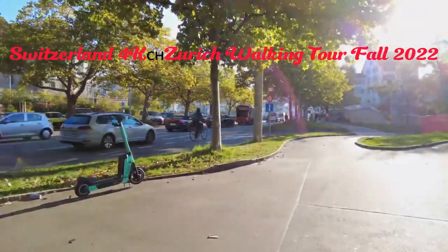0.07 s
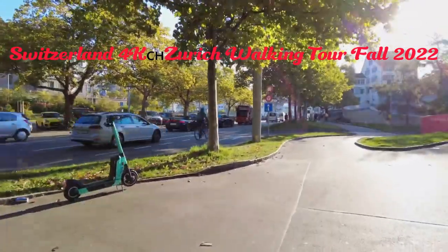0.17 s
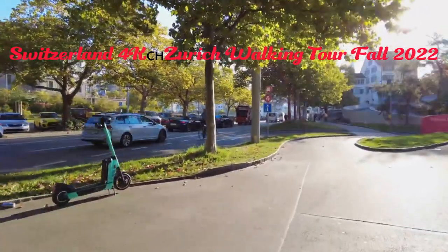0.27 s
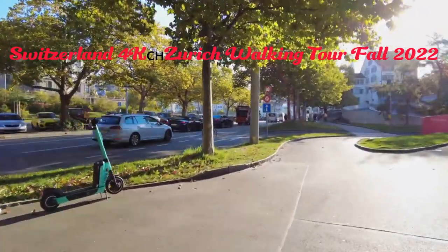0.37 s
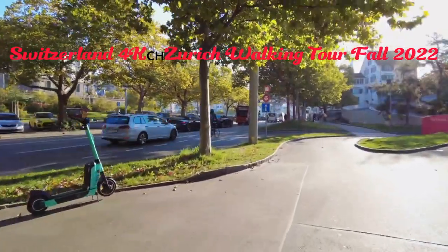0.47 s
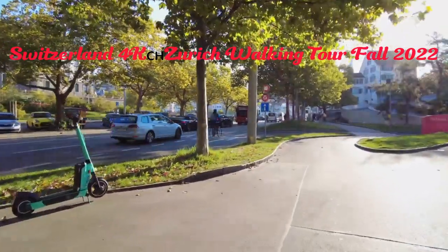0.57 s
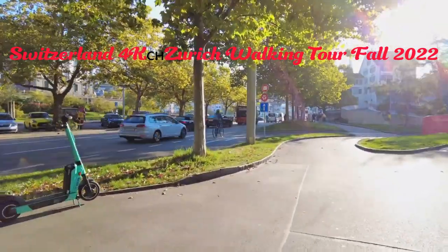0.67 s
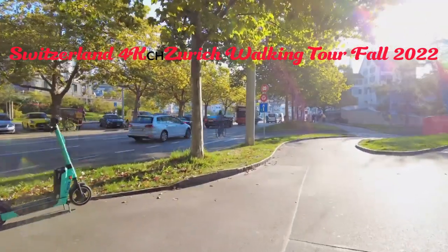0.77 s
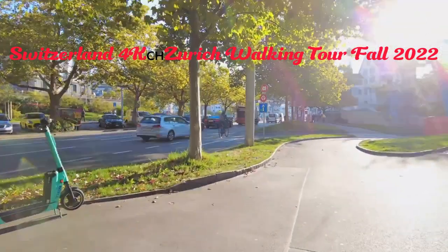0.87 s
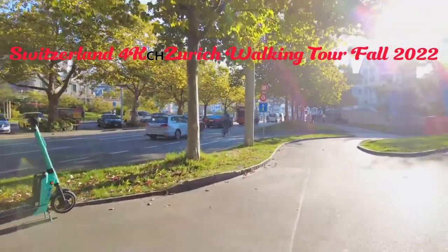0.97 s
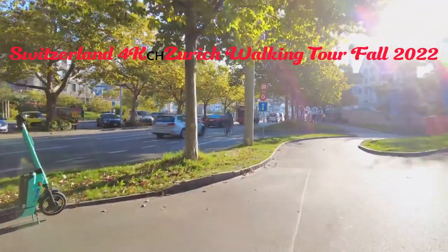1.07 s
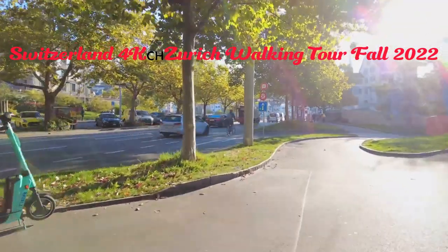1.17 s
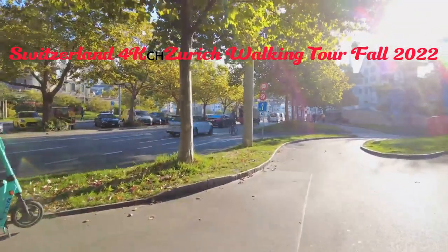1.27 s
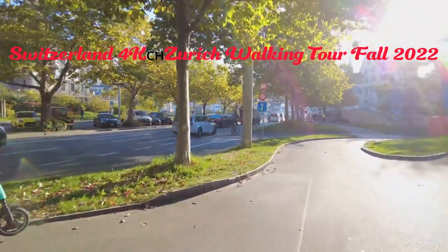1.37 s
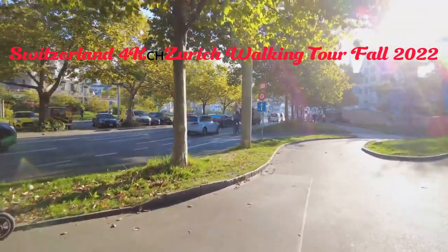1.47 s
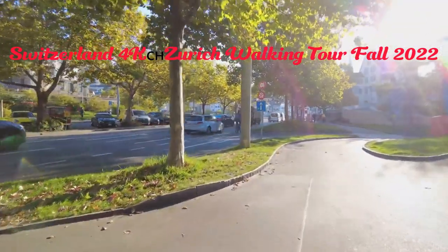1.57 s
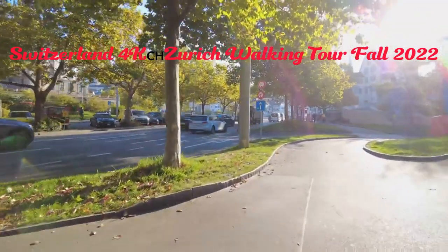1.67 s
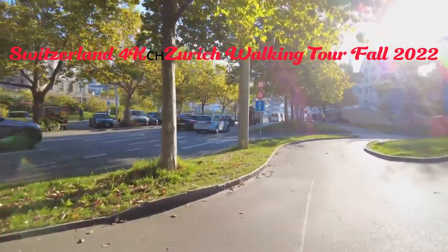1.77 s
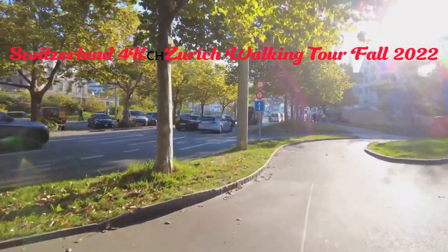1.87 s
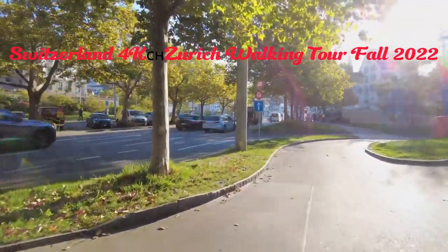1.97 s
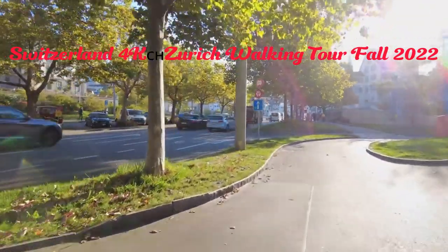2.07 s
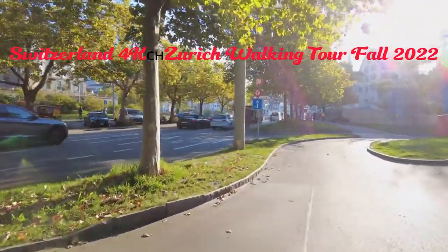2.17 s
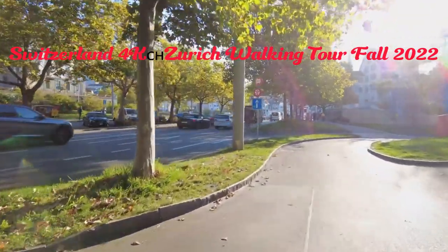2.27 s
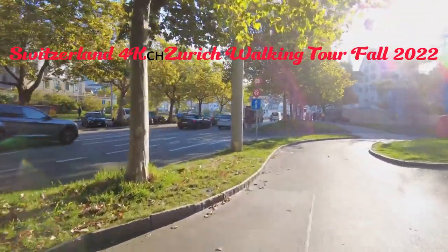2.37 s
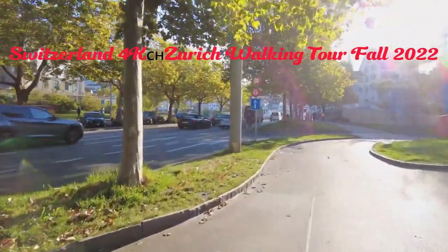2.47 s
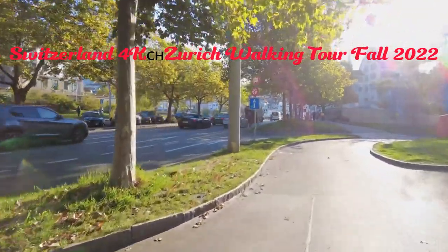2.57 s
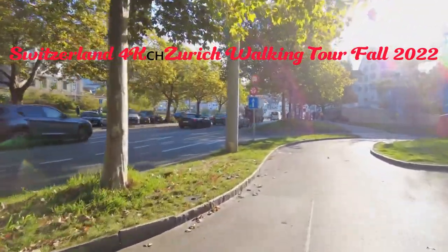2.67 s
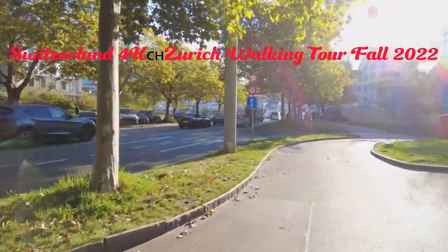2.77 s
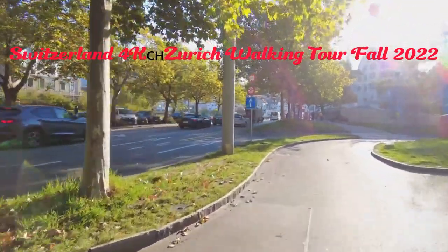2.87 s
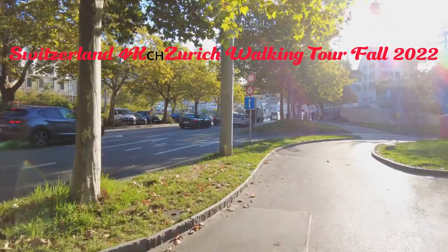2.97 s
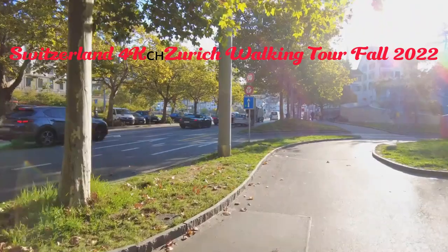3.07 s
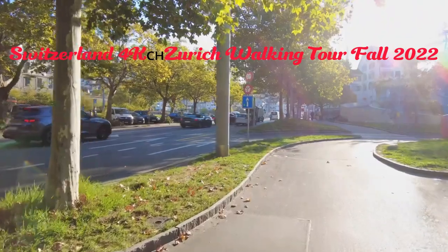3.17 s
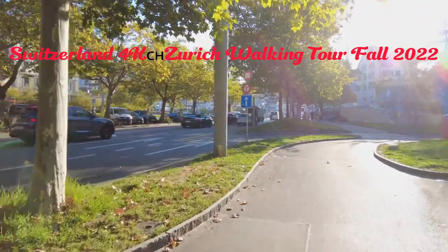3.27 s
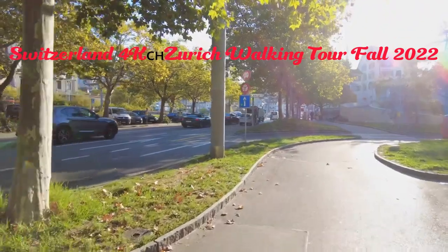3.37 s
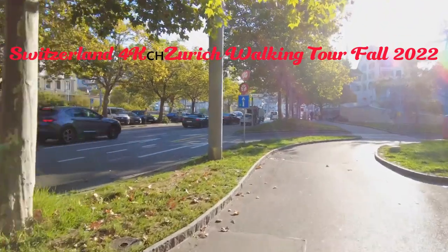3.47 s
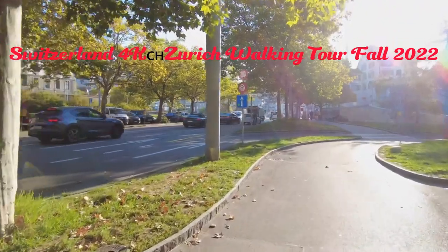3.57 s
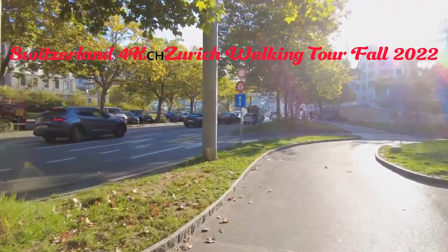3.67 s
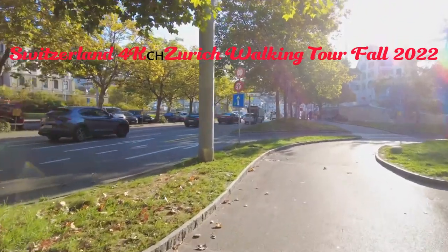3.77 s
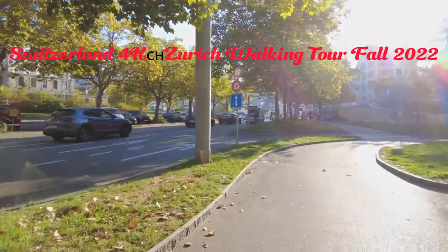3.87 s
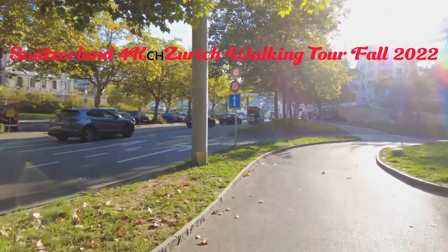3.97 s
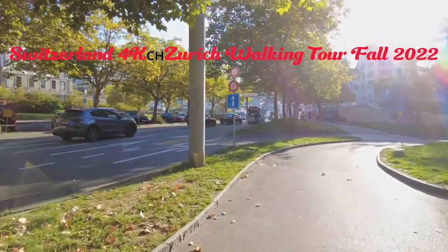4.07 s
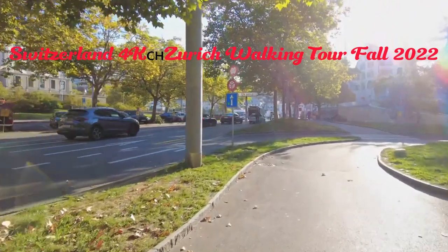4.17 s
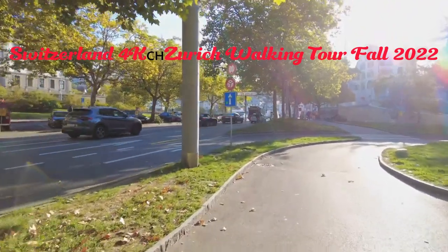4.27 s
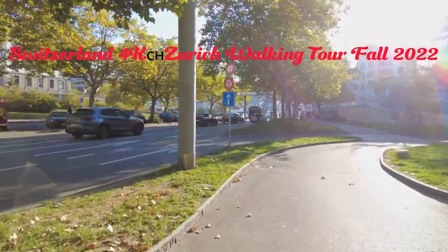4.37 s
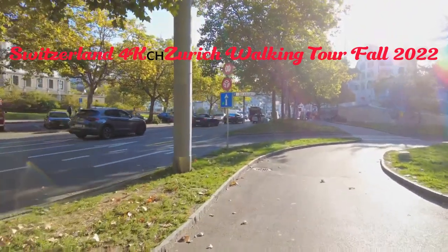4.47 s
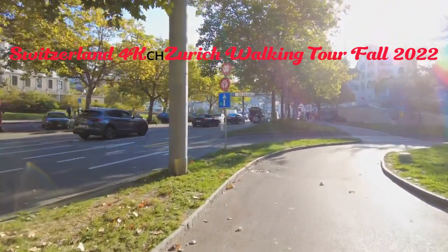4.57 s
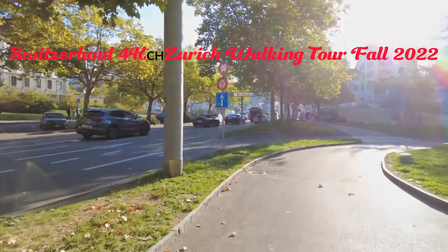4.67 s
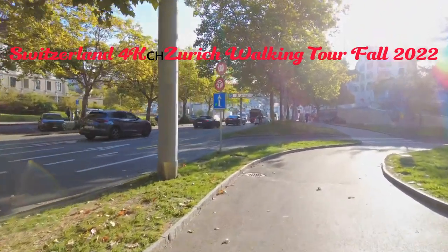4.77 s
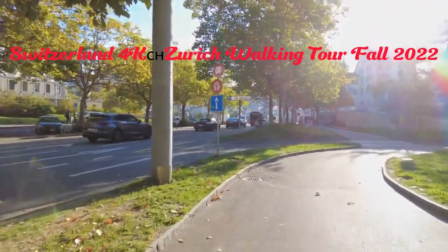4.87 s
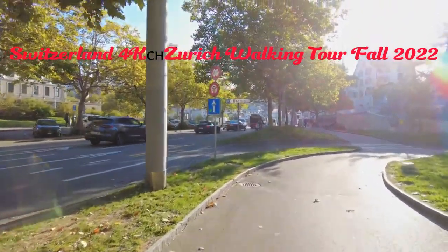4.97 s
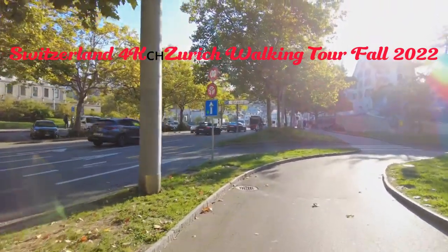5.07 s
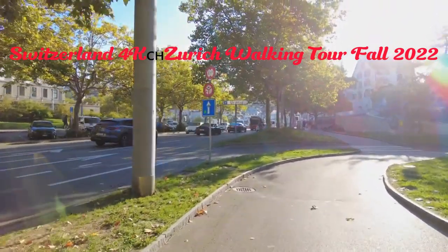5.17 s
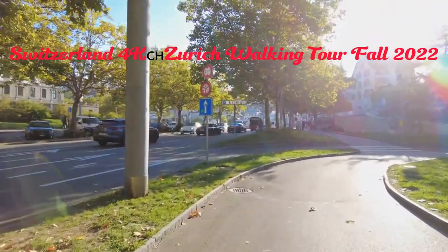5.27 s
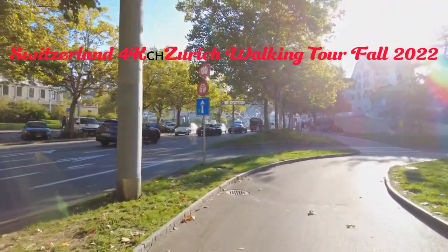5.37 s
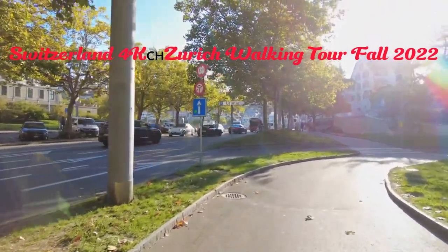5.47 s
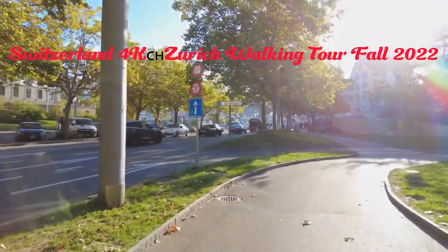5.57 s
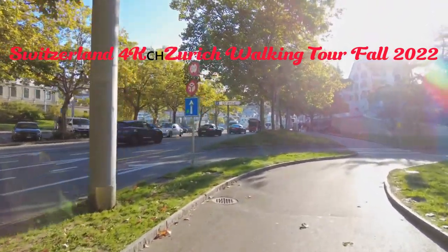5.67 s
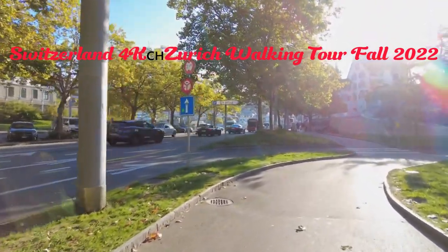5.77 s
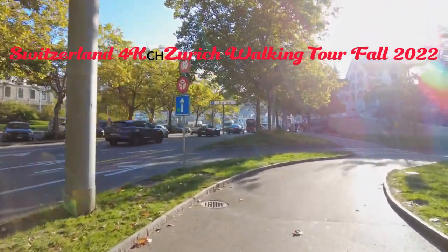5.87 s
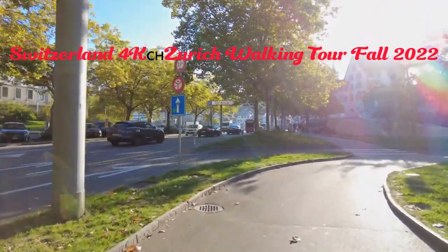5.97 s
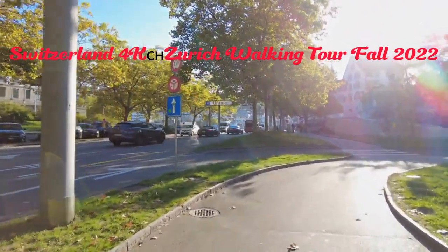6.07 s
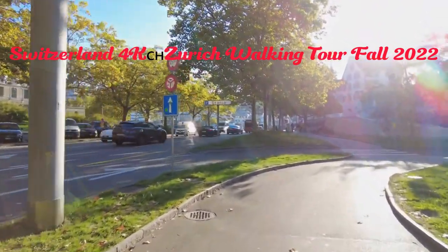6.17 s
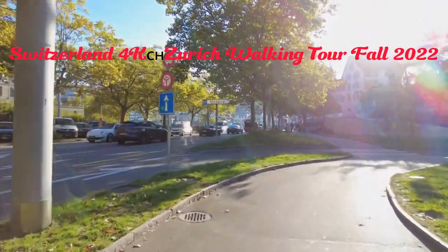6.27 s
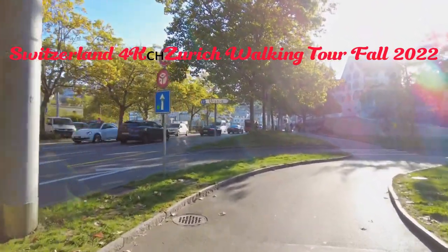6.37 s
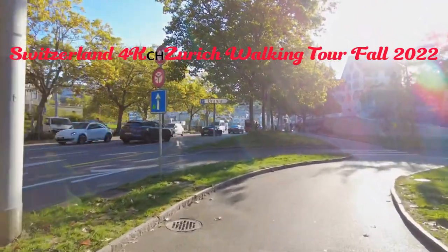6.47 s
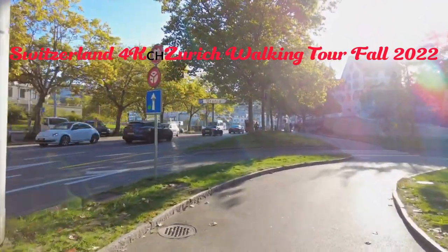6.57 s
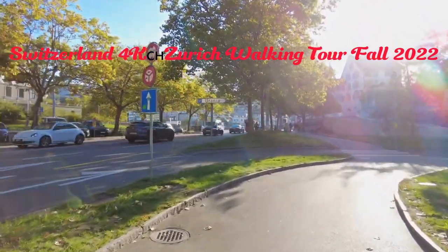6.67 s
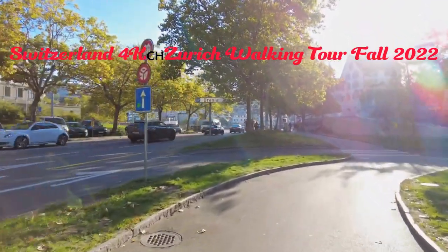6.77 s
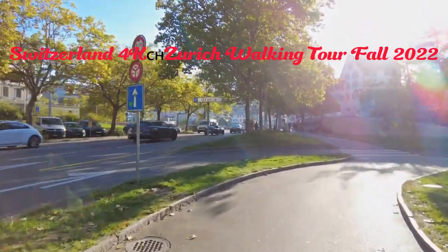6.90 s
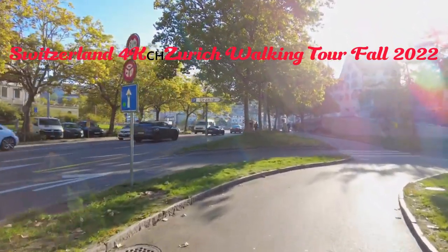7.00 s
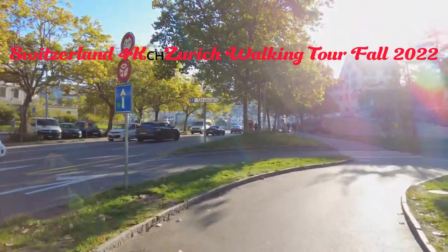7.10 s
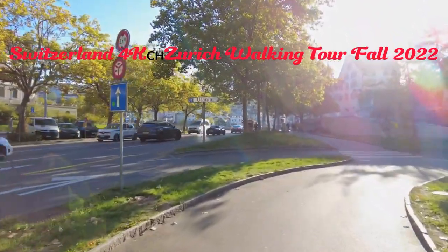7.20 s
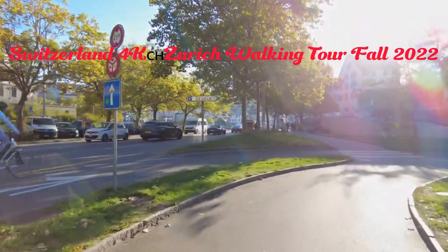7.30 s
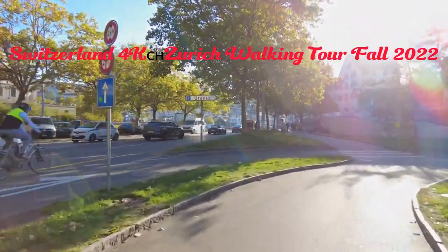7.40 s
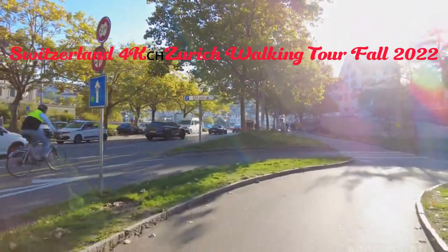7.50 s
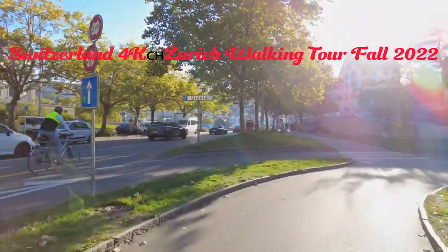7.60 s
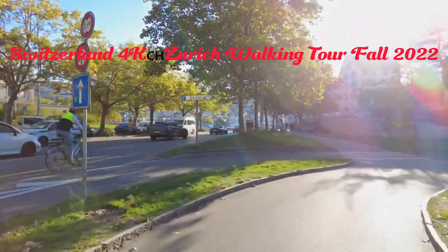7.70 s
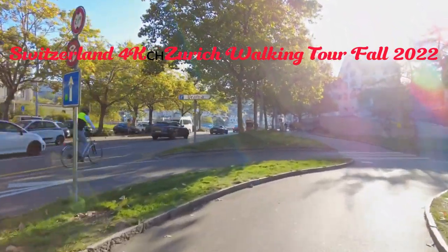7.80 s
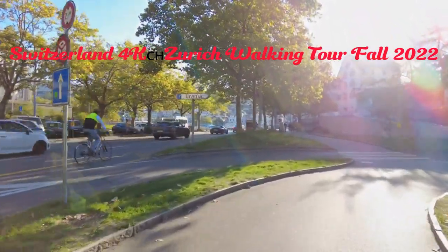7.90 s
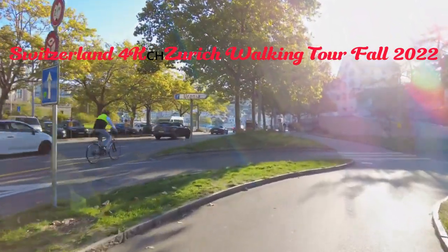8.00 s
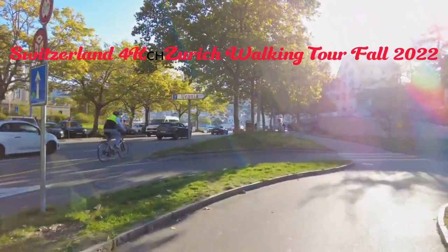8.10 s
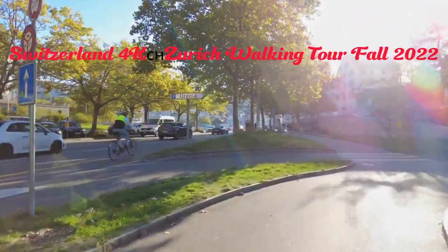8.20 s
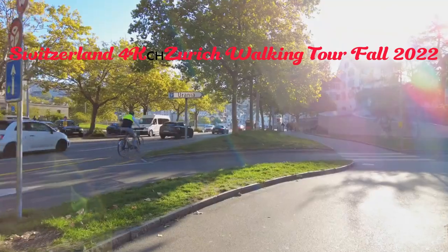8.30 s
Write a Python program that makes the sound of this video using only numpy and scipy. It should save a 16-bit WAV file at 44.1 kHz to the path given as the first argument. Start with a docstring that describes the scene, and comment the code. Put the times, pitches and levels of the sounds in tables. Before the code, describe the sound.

Slow city traffic rumbles and drones beside a walker whose shoes scuff softly on gritty asphalt, with low engine notes swelling and sinking.

```python
"""City street on foot, slow traffic

A walker passes along a street, picked up in two channels with the cars and the shoes.
Engines drone as sines on their firing rates among single gliding tones; low thuds are decaying modes.
Exhaust boom and rumble, roar, tyres and hiss are shaped noise that drifts in level and bearing.
Shoes scuff in clumps of tiny clicks on gritty asphalt, and single grains snap with a short ping.
"""
import sys
import numpy as np
from scipy import signal
from scipy.fft import rfft, irfft
from scipy.io import wavfile
from scipy.ndimage import uniform_filter1d

SR = 44100
rng = np.random.default_rng(int(sys.argv[2]) if len(sys.argv) > 2 else 0)


def transcribe(u):
    """Save the signal u as a 16-bit wav file named by the first command-line argument.

    u: samples, shape (n,) or (channels, n), limited to [-1, 1]; the rate is SR.
    q: integer samples, one column per channel.
    """
    v = np.clip(np.atleast_2d(u).T, -1, 1)
    q = np.round(v * 32767).astype(np.int16)
    wavfile.write(sys.argv[1], SR, q)


N = 367794

# likeness, lead and level difference of the two channels by frequency, before the road noise wanders:
# (frequency [Hz], likeness [0-1], lead of the left channel [rad], left minus right [dB])
CHANNEL_PAIR = [(60, .99, .16, -1.8), (200, .95, .5, .2), (350, .9, .93, .2), (480, .85, 1.3, 1),
                (600, .68, 1.72, 1.4), (700, .7, 2.1, 1.7), (1000, .93, 3.1, 1.3), (1190, .93, 3.5, 2),
                (1205, .8, .47, 1.5), (1600, .78, .45, .7), (2300, .5, .6, .4), (3300, .14, 1.2, .8),
                (5000, .08, 2.9, 1.4), (7000, .12, 0, 1), (11000, .26, 0, .8), (15000, .28, 0, .7)]
# spectrum of crushed grit: (frequency [Hz], relative level [dB])
GRIT_SPECTRUM = [(2000, -30), (4000, 1), (6500, 0.5), (9000, -6.5), (12000, -10), (15500, -16)]


def gain_of(db):
    """Amplitude factor of a level in dB."""
    return 10 ** (np.asarray(db) / 20)


def evened(x):
    """Scales x to an rms of 1."""
    return x / np.sqrt(np.mean(x ** 2) + 1e-20)


def read(points, hz):
    """Reads the columns of a table at any frequency, along a log frequency axis."""
    f, *values = np.transpose(points)
    return np.squeeze([np.interp(np.log(hz + 1), np.log(f + 1), v) for v in values])


def add(mix, s, sound):
    """Lays a sound into the mix from s seconds on."""
    part = mix[..., round(s * SR):][..., :sound.shape[-1]]
    part += sound[..., :part.shape[-1]]


def colour(x, points):
    """Shapes x by a spectrum."""
    hz = np.fft.rfftfreq(x.shape[-1], 1 / SR)
    return irfft(rfft(x) * gain_of(read(points, hz)), x.shape[-1])


def drift(count, seconds):
    """Smooth random wander of rms 1."""
    size = int(seconds * SR) + 1
    once = uniform_filter1d(rng.standard_normal(count), size)
    return evened(uniform_filter1d(once, size))


def mottle(shape, bins, frames):
    """Random patches of rms 1, so many bins (10.8 Hz) wide and frames (23 ms) long."""
    wide = uniform_filter1d(rng.standard_normal(shape), size=bins, axis=0)
    return evened(uniform_filter1d(wide, size=frames, axis=1))


def road_power(hz, t):
    """Power of five noise layers, each a fixed spectrum under a moving level, two of them tilting."""
    # controls of the road noise; rumble, tyres and hiss take shares of the first two, the roar has its
    # own level: (time [s], nearness of the line of cars [dB], swell of rolling tyres [dB], roar level [dB])
    controls = [(0.0, 2, 1, -38.5), (.3, 3.5, 1.5, -42.5), (0.7, 3, 1, -44), (1.4, 2.5, 1, -41),
                (2.1, 1, -0.5, -44.5), (2.8, 0.5, -2, -45.5), (3.2, 0, -2, -46), (3.9, -1.5, -3.5, -51),
                (4.6, -2, -4, -53.5), (4.9, -1.5, -2.5, -51), (5.15, -2, -3.5, -48), (5.4, -2, -1.5, -50),
                (5.55, -2.5, 0.5, -47.5), (5.8, -3.5, 1, -47.5), (6.0, -2.5, -2, -47),
                (6.25, -2.5, -2.5, -49), (6.6, -0.5, 1, -47.5), (6.95, -2, -1.5, -50),
                (7.3, -1.5, 1.5, -51), (7.7, -0.5, 2, -44), (8.34, -1.5, 2.5, -46)]
    # level of the boom: (time [s], level [dB])
    boom_level = [(0.0, -33), (.5, -37), (1.4, -37), (2.8, -36.5), (3.7, -33.5), (4.5, -36.5), (4.9, -39),
                  (5.8, -36), (6.3, -38), (8.34, -39)]
    # rows rumble, tyres, hiss: (level [dB], share of nearness [ratio], share of tyre swell [ratio])
    layer_shares = [(-39.5, 0.66, -0.3), (-43.5, .05, 0.9), (-47.5, 0.93, 0.12)]
    # spectra of the layers, lowest first: (frequency [Hz], relative density [dB])
    boom_spectrum = [(15, -3), (30, 6.5), (45, 10.5), (60, 3.5), (100, -2.5), (150, -4.5), (200, -12),
                     (500, -60)]
    rumble_spectrum = [(60, -45), (150, -4.5), (200, -2), (250, -5.5), (300, -5.5), (380, -12.5),
                       (700, -22), (3000, -97)]
    roar_spectrum = [(100, -67), (250, 1.5), (400, 0), (520, -0.5), (548, 3), (580, -1), (700, -1),
                     (1000, -7), (2000, -37), (5000, -90)]
    tyre_spectrum = [(200, -66), (500, -25), (800, 0.5), (1000, -1), (1200, 0), (1380, 0.5), (1650, -1.5),
                     (1900, -8.5), (2300, -17), (4000, -60), (9000, -90)]
    hiss_spectrum = [(800, -65), (1700, 0), (2020, 0.5), (2300, -2), (2900, -0.5), (3600, -8.5), (4500, -9),
                     (6000, -13), (7000, -17), (8500, -21.5), (10000, -25.5), (12500, -27.5),
                     (15600, -34.5)]
    s, near_db, swell_db, roar_db = np.transpose(controls)
    boom_db = np.interp(s, *np.transpose(boom_level))
    rumble_db, tyre_db, hiss_db = (
        db + near * near_db + swell * swell_db for db, near, swell in layer_shares)
    *_, roar_tilt, hiss_tilt = bearing_at(t)
    roar_tilt_db = np.outer(np.log2((hz + 1) / 500), roar_tilt)  # pivots at 500 Hz
    hiss_tilt_db = np.outer(np.log2((hz + 1) / 4500), hiss_tilt)  # pivots at 4500 Hz
    # the band [Hz] in which each level holds, before tilt
    layers = [(boom_spectrum, boom_db, 0, (100, 170)),
              (rumble_spectrum, rumble_db, 0, (200, 380)),
              (roar_spectrum, roar_db, roar_tilt_db, (400, 700)),
              (tyre_spectrum, tyre_db, 0, (1250, 2000)),
              (hiss_spectrum, hiss_db, hiss_tilt_db, (2500, 9000))]
    power = 0
    for spectrum, db, tilt_db, (lo, hi) in layers:
        density = gain_of(2 * read(spectrum, hz))
        density = density / density[(hz > lo) & (hz < hi)].sum()
        power = power + density[:, None] * gain_of(2 * (np.interp(t, s, db) + tilt_db))
    return power


def bearing_at(t):
    """The road noise shifts as the walker moves on: lead, spread and two tilts at the times t."""
    # (time [s], added lead of the left channel [microseconds], spread of the sources [exponent on
    # likeness: 1 usual, higher wider], roar tilt [dB per octave], hiss tilt [dB per octave])
    bearing = [(0.0, -30, 0.87, 0, 0.5), (.9, -11, 1.04, 0, 0.5), (2.1, -10, 0.79, 0.5, 0),
               (3.3, -15, 1.2, -4, 0.5), (4.4, -39, 1.05, 5, 0), (5.1, -27, 0.78, 2, -0.4),
               (5.8, -7, 0.79, -4, 0.3), (6.7, 10, 0.74, 11, 0.1), (7.4, 15, 0.91, 6, -0.5),
               (8.34, 55, 0.57, -3, 1.5)]
    s, *columns = np.transpose(bearing)
    return [np.interp(t, s, c) for c in columns]


def traffic(patchy_db=0.75, flicker_db=1.8, streak_db=2.5, lead_wander=0.28, surge_db=1.05):
    """Road noise, partly alike in both channels; patches drift and the treble flickers."""
    hz = np.fft.rfftfreq(4096, 1 / SR)
    t = np.arange(N // 1024 + 5) * 1024 / SR
    shape = len(hz), len(t)
    a, b, c, d = rng.standard_normal((4, *shape))
    left, other = a + 1j * b, c + 1j * d
    lead_us, spread, *_ = bearing_at(t)
    same, lead, side_db = read(CHANNEL_PAIR, hz)[:, :, None]
    # the loudest car keeps changing, so the delay between the channels wanders
    lead = lead * (1 + lead_wander * mottle(shape, 6, 3))
    # above 3 kHz the added lead grows no further in phase
    lead = lead + 2 * np.pi * np.outer(np.minimum(hz, 3000), lead_us) / 10 ** 6
    same = same ** spread
    half = gain_of(side_db / 2) * np.exp(.5j * lead)
    right = same * left + np.sqrt(1 - same ** 2) * other
    z = np.array([left * half, right / half])
    # narrow, lingering streaks in the low end
    z *= gain_of(streak_db * mottle(shape, 2, 14) * np.clip(1 - hz / 1000, 0, 1)[:, None])
    # the low noise surges and dips in random patches
    z *= gain_of(surge_db * mottle(shape, 8, 5) * np.clip(1 - hz / 1300, 0, 1)[:, None])
    treble = np.clip(hz / 10000, 0, 1)[:, None]
    flicker = treble * mottle(shape, 300, 2)
    z *= gain_of(patchy_db * mottle(shape, 40, 5) + flicker_db * flicker)
    z *= np.sqrt(road_power(hz, t))
    return np.sqrt(2 / 3) * signal.istft(z, nperseg=4096, noverlap=3072)[1][:, :N]


def engine(rows, orders, upper=(), waver_db=0.83, upper_waver_db=2.0, unsteady=0.00209):
    """Sines on multiples of the firing rate; uneven combustion makes pitch and strength waver."""
    s, *columns = np.transpose(rows)
    t = np.arange(s[0], s[-1], 1 / SR)
    hz, *levels_db = (np.interp(t, s, c) for c in columns)
    lines = []
    for k, db in zip(orders, levels_db):
        db = db + waver_db * drift(len(t), 0.024)
        if k > 1:
            db = db + upper_waver_db * drift(len(t), .12)
        lines.append((k, db))
    # the high multiples come and go as other cars shade the path
    for k, db in upper:
        lines.append((k, levels_db[-1] + db + upper_waver_db * drift(len(t), 0.14)))
    turns = np.cumsum(hz * (1 + unsteady * drift(len(t), 0.079))) / SR
    tones = sum(gain_of(db) * np.sin(2 * np.pi * (k * turns + rng.random())) for k, db in lines)
    fades = signal.windows.tukey(len(t), 0.022 / (s[-1] - s[0]))  # 11 ms at each end
    return s[0], np.sqrt(2) * tones * fades  # levels are rms


def glide(start, length, from_hz, to_hz, bend, top_db):
    """One tone bends from pitch to pitch under a rounded swell, 8 dB down at both ends."""
    u = np.linspace(0, 1, 40)
    hz = from_hz + (to_hz - from_hz) * u ** bend
    return np.transpose([start + length * u, hz, top_db - 8 * abs(2 * u - 1) ** 2])


def drones(mix):
    """Single tones, low drones and faint whines, swelling and fading; some glide in pitch."""
    # (start [s], length [s], from [Hz], to [Hz], bend of the glide [exponent: under 1 early, over 1 late],
    # mean rms level at the top of the swell [dB])
    single_tones = [(0.0, 1.05, 35.77, 40.56, 0.98, -30), (0.0, 0.4, 47.5, 45.3, 0.36, -28),
                    (0.0, 0.39, 60.5, 59.3, 0.9, -30.5), (0.402, 1.2, 71.8, 71.6, 0.99, -31.5),
                    (0.6, 1.32, 150.6, 175.8, 0.603, -39.5), (0.75, 0.97, 178.5, 202.8, 1.0, -40.5),
                    (1.609, 1.2, 64.1, 66.7, 0.93, -33), (1.9, 1.5, 125, 142.5, 0.66, -45),
                    (2.75, 0.78, 193, 186.7, 1.75, -37.5), (3.099, 1.05, 28.9, 26.9, 0.8, -31),
                    (4.099, 0.73, 25.7, 28.04, 1.12, -33), (5.199, 1.3, 68.96, 89.7, 0.898, -33),
                    (6.499, 0.59, 29.36, 28.36, 0.99, -36), (7.0, 0.7, 115.8, 139, 1, -38.5),
                    (0.0, .9, 549, 545, 0.9, -55.5), (7.6, 0.68, 543, 540, 0.91, -52),
                    (0.0, 5.2, 2006, 1990, 1.04, -65)]
    for row in single_tones:
        add(mix, *engine(glide(*row), (1,)))


def thuds(mix):
    """Low thuds, as of wheels over a seam in the road: three modes ring after a soft onset."""
    # (time [s], level on top of the modes [dB])
    hits = [(0.149, -31), (2.47, -25.5), (2.51, -37), (3.005, -28.5), (3.099, -21), (3.747, -20.5),
            (3.845, -25), (4.383, -20), (4.421, -21.5), (4.505, -25), (6.518, -29)]
    # (frequency [Hz], level before the onset [dB], t60 [s])
    modes = [(126, 7, 0.14), (145.6, 1, 0.093), (90, -10, 0.13)]
    t = np.arange(SR // 2) / SR
    onset = 1 - np.exp(-t / 0.011)
    ring = sum(gain_of(db - 60 * t / t60) * np.sin(2 * np.pi * hz * t) for hz, db, t60 in modes)
    for s, db in hits:
        add(mix, s, gain_of(db) * ring * onset)


def passing_engines(mix):
    """Four-cylinder engines: the upper multiples change slowly while the exhaust boom swells."""
    # one table per engine: (time [s], firing rate [Hz], level [dB])
    firing = [
        [(0.4, 56.1, -28), (0.8, 54.7, -24), (1.2, 52.8, -28), (1.5, 52.6, -25.5), (1.67, 52.6, -16.5),
         (1.81, 51, -19), (1.97, 50.24, -17), (2.35, 48.65, -20), (2.51, 47.7, -15.5), (2.77, 47.5, -18.5),
         (2.93, 46.03, -26), (3.07, 45.85, -21), (3.3, 43.85, -23.5), (3.65, 41.33, -20), (3.95, 40.3, -23.5),
         (4.2, 37.8, -46)],
        [(4.2, 49.05, -44), (4.6, 50.2, -28.5), (4.9, 45.91, -33), (5.4, 47.8, -30.5), (5.7, 49.96, -33.5),
         (6.0, 52.04, -26), (6.4, 50.7, -33.5), (6.8, 49.9, -28.5), (7.0, 48.95, -36), (7.2, 48.3, -26.5)],
        [(7.3, 42.8, -42), (7.4, 44.07, -35), (7.48, 44.65, -19), (7.62, 46.47, -34), (7.74, 48, -20.5),
         (7.9, 48.7, -24.5), (8.07, 49.42, -14), (8.17, 49.4, -19), (8.33, 48.5, -50)],
    ]
    # one row per engine: (2nd multiple at start, a third, two thirds and end [dB], 4th likewise [dB])
    upper_levels = [(-33.5, -40.5, -38.5, -48, -44.5, -51, -41.5, -46.5),
                    (-56, -52, -45, -49, -49, -52, -56, -60),
                    (-38, -37.5, -38, -35.5, -53, -40.5, -46.5, -42.5)]
    for rows, upper_db in zip(firing, upper_levels):
        s = np.transpose(rows)[0]
        thirds = np.linspace(s[0], s[-1], 4)
        ramps_db = [np.interp(s, thirds, db) for db in np.reshape(upper_db, (2, 4))]
        add(mix, *engine(np.column_stack([rows, *ramps_db]), (1, 2, 4)))


def steps():
    """Each step crushes a clump of grit: dense tiny clicks of unequal size, swelling and dying fast."""
    # shoes on asphalt: (time, 4 ms after the start [s], rms level before onset and decay [dB],
    # decay t60 [s], left minus right [dB])
    footfalls = [(.889, -58, 0.43, .5), (1.322, -57, .15, -8), (1.941, -50, 0.4, 1), (2.381, -53, .1, -3),
                 (2.86, -57, 0.79, -2), (3.419, -55, .12, -3), (3.52, -61, 0.6, 3), (3.931, -59, 0.32, 4),
                 (4.476, -55, 0.12, -5), (4.979, -58, .15, 7), (5.513, -54, 0.12, 0), (6.01, -58, 0.32, 0),
                 (6.48, -61, 0.16, 0), (6.534, -59, 0.28, 4), (6.632, -57, 0.14, 4), (7.046, -57, 0.19, 0),
                 (7.562, -54, 0.14, .5), (7.895, -56, 0.36, .5), (8.06, -57, 0.24, 1),
                 (8.102, -60, 0.071, -1)]
    out, t = np.zeros((2, N)), np.arange(8192) / SR
    onset = 1 - np.exp(-t / 0.0014)
    for s, db, t60, side_db in footfalls:
        sizes_db = 1.8 * np.minimum(rng.exponential(1, len(t)), 4)
        grains = rng.standard_normal((2, len(t))) * gain_of(sizes_db)
        # each channel also carries a little of the other's grains
        grains = evened(colour(grains + grains[::-1] * 0.19, GRIT_SPECTRUM))
        shape = gain_of(db - 60 * t / t60) * onset
        add(out, s - .004, grains * shape * gain_of([[side_db / 2], [-side_db / 2]]))
    return out


def pings():
    """Grains snap under the sole: a dry click and a few cycles at one pitch, the same in both channels."""
    # (time [s], click peak [dB], ping level before onset and decay [dB], ping pitch [Hz], ping t60 [s])
    snaps = [(1.942, -43, -52, 6170, .02), (1.953, -47, -55, 6340, .02), (1.965, -48, -58, 6200, .015),
             (2.378, -42, -53, 6700, .012), (3.421, -52, -62, 6460, .012), (4.473, -41, -52, 6850, .01),
             (4.98, -52, -62, 6500, .012), (5.51, -48, -62, 6430, .012), (5.515, -58, -53, 6630, 0.013),
             (5.618, -52, -54, 6300, .01), (7.315, -62, -51, 9346, .012), (7.406, -58, -54, 9300, .018),
             (7.585, -60, -55, 6200, .012), (7.896, -44, -54, 8480, .012), (7.903, -48, -53, 8300, .012),
             (8.099, -50, -46, 6530, .012)]
    out, t = np.zeros(N), np.arange(2048) / SR
    onset = 1 - np.exp(-t / .0005)
    click = colour(signal.unit_impulse(256, "mid"), GRIT_SPECTRUM)
    for s, click_db, db, hz, t60 in snaps:
        add(out, s - len(click) / 2 / SR, gain_of(click_db) * click / click.max())
        add(out, s - .001, gain_of(db - 60 * t / t60) * onset * np.sin(2 * np.pi * hz * t))
    return out


def pulling_away(mix):
    """A car pulls away, holds its speed and eases off: one sine follows its firing rate."""
    # (time [s], firing rate [Hz], level [dB])
    pull = [(2.9, 52.6, -38), (3.07, 57.2, -20.5), (3.25, 67.2, -31), (3.55, 69.8, -28),
            (4.15, 70.2, -26.5), (4.3, 67.9, -33.5), (4.47, 61.4, -30), (4.63, 66.5, -35), (4.8, 64.4, -44)]
    add(mix, *engine(pull, (1,)))


def steady_engine(mix):
    """An engine at steady speed: multiples of 36.27 Hz, each rising and falling on its own."""
    # times of the levels [s]
    times = (4.85, 5.1, 5.4, 5.7, 6.3, 6.85, 7.2)
    # rows are the multiples 1, 2, 4, 5: (level at each of the seven times [dB])
    levels = [(-50, -48, -38, -52, -53, -34, -47), (-32.5, -34, -32, -36.5, -31.5, -32.5, -41.5),
              (-48, -40.5, -43, -48, -43, -41.5, -58), (-45, -39.5, -49.5, -39, -39.5, -37.5, -45.5)]
    # fainter high multiples: (multiple [ratio], level relative to the 5th multiple [dB])
    high_multiples = [(6, -24), (8, -12.5), (15, -29)]
    rows = np.vstack([times, [36.27] * len(times), levels]).T
    add(mix, *engine(rows, (1, 2, 4, 5), high_multiples))


def from_road_side(mix):
    """Engines and thuds arrive from the road side: one signal, led and levelled apart by channel."""
    _, lead, side_db = read(CHANNEL_PAIR, np.fft.rfftfreq(N, 1 / SR))
    half = gain_of(side_db / 2) * np.exp(.5j * lead)
    return irfft(rfft(mix) * np.array([half, 1 / half]), N)


def scene():
    """The road side, the road noise and the walker's shoes in both channels."""
    road_side = np.zeros(N)
    for source in (drones, thuds, passing_engines, pulling_away, steady_engine):
        source(road_side)
    return traffic() + from_road_side(road_side) + steps() + pings()


def record(dry):
    """The band limit of the recorder: a steep low-pass at 15.7 kHz."""
    low_pass = signal.firwin(1023, 15700, window=("kaiser", 9), fs=SR)
    return signal.oaconvolve(dry, low_pass[None], "same")


dry = scene()
out = record(dry)
transcribe(out)
```